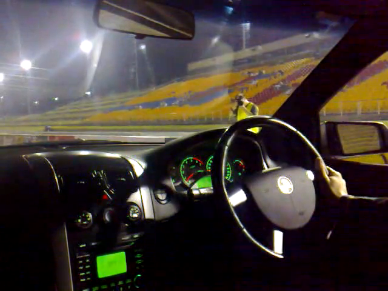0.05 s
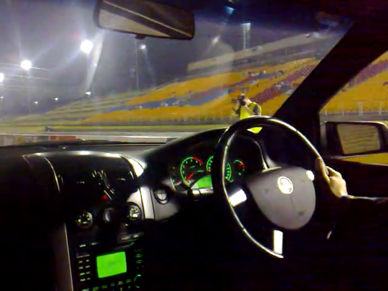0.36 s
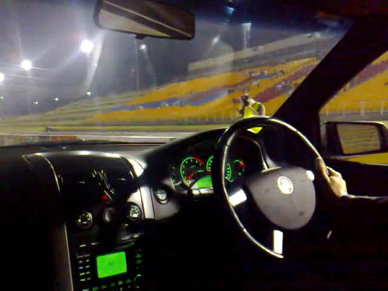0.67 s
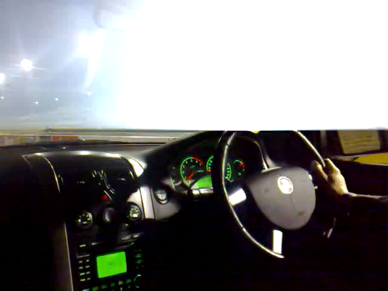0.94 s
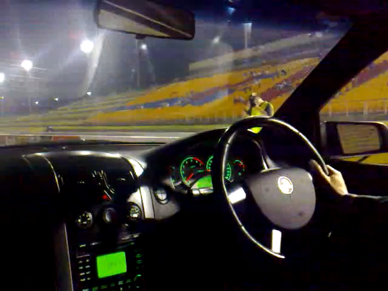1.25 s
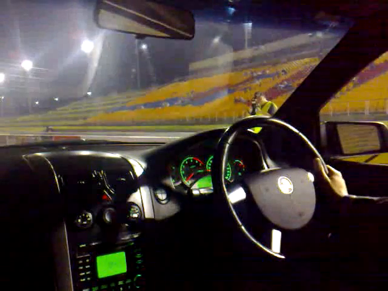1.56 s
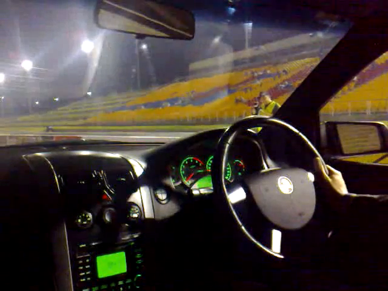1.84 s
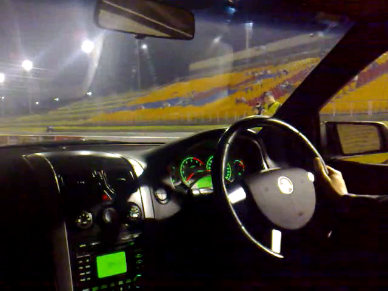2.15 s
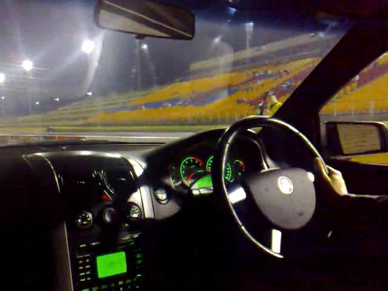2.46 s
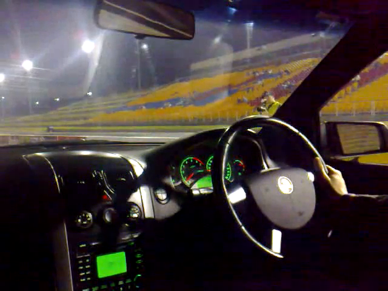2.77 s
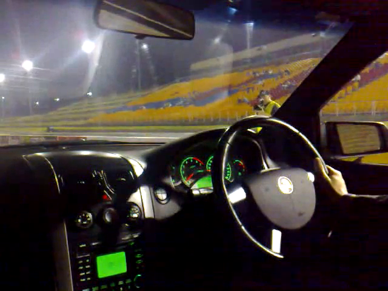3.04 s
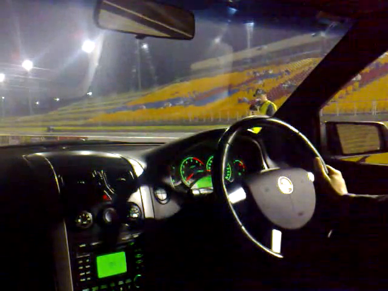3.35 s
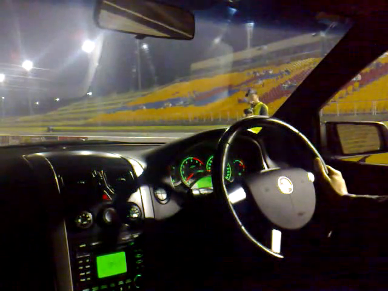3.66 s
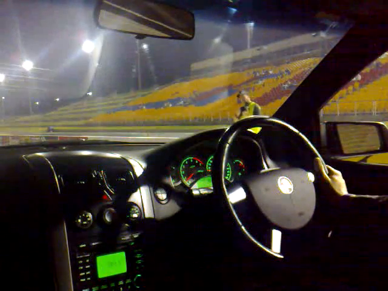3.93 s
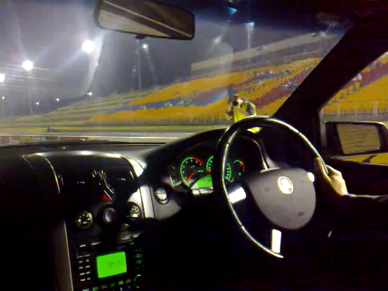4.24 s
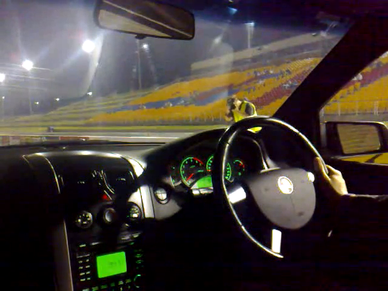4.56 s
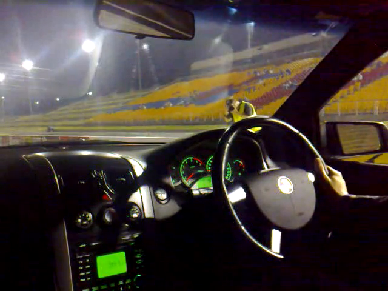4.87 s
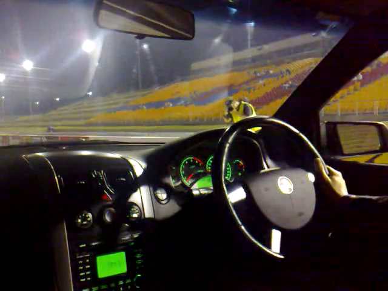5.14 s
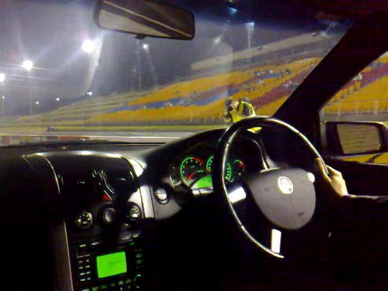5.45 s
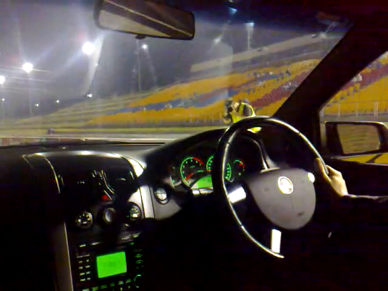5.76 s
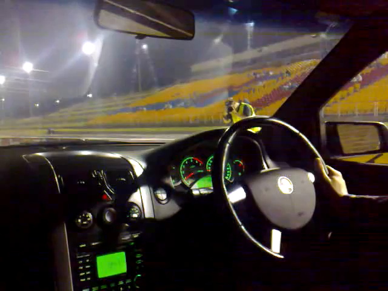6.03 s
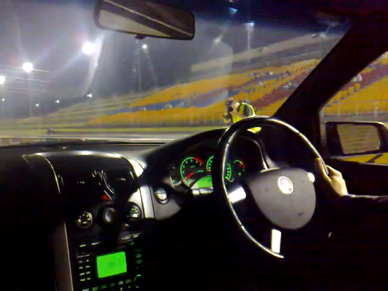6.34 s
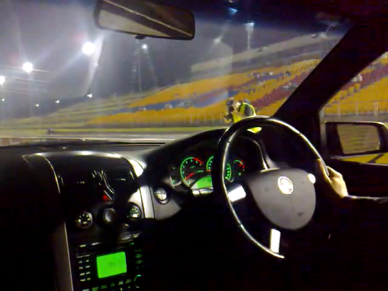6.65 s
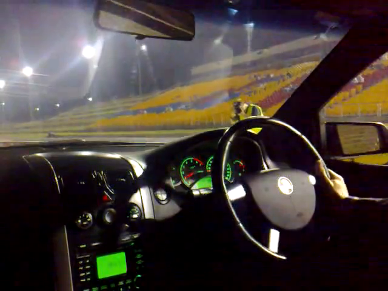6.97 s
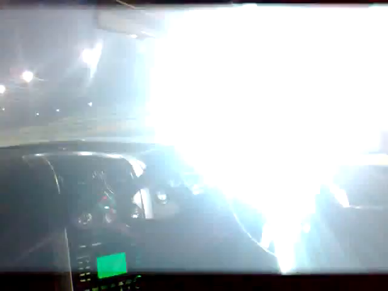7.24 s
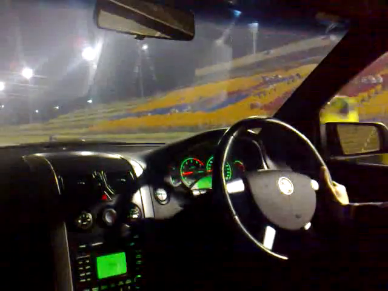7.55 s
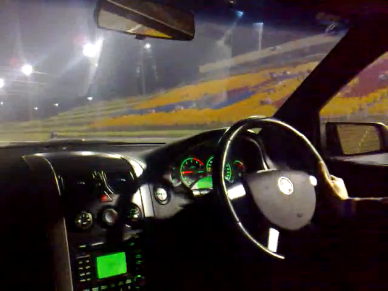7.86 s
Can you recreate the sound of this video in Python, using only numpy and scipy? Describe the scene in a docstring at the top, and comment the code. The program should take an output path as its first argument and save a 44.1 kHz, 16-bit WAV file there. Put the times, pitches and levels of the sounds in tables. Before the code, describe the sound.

A V8 engine idles with a low, uneven lope, heard from between the seats of a car at a drag strip. A few light clicks and trim knocks sound over it. After almost six seconds the revs rise and hold with a boom, sagging a little. Then the car launches at full throttle with a drivetrain clunk, thuds and clattering plastic, the roar climbing fast and starting to ease at the very end.

```python
"""A V8 engine, heard inside the car at a drag strip, lopes at idle, rises against the brake, then launches.
Its firings form a periodic pulse train whose harmonics sweep through the air modes of the cabin, which
boom by resonance. Impacts excite damped vibrations: the drivetrain clunks, loose plastic things clatter
as the car leaps, panels thud and trim knocks. Clothing rustles faintly by friction.
Under full throttle a limiter at the microphone holds down the level and rounds off the peaks."""
import sys
import numpy as np
from scipy import signal
from scipy.fft import rfft, irfft, next_fast_len
from scipy.io import wavfile
from scipy.ndimage import uniform_filter1d, minimum_filter1d, map_coordinates

SR = 44100
rng = np.random.default_rng(int(sys.argv[2]) if len(sys.argv) > 2 else 0)


def persist_wave(psi):
    """Save psi, clipped to +-1, as 16-bit WAV."""
    counts = np.round(np.clip(psi, -1, 1) * 32767).astype(np.int16)
    wavfile.write(sys.argv[1], SR, np.atleast_2d(counts).T)


N = 357210
TIME = np.arange(N) / SR
IDLE_HZ, PULL_HZ = 36.95, 121.4  # firing rates at idle and under full pull

# engine speed: idle, rise against the brake, sag, launch (t/s, firing rate/Hz)
FIRING_RATE = [(5.72, 36.95), (5.84, 40.1), (6.12, 62.3), (6.26, 65.5), (6.7, 58.4), (7.08, 54.5),
               (7.17, 59.5), (7.23, 75), (7.31, 84.5), (7.385, 88.5), (7.43, 97.5), (7.48, 106),
               (7.52, 111), (7.59, 116.2), (7.66, 118.0), (7.94, 121.6), (8.1, 126.2)]
# throttle position (t/s, opening from 0 to 1)
THROTTLE = [(7.012, 0), (7.04, 0.2), (7.15, 0.6), (7.22, 1)]
# exhaust bank of each cylinder, in firing order (0 near, 1 far)
BANKS = [0, 1, 1, 0, 1, 0, 0, 1]
# firing note under throttle, dipping briefly as the revs climb (t/s, level/dB)
NOTE_LOADED = [(7.08, -20), (7.135, -26.5), (7.165, -9.5), (7.195, -13), (7.215, -17), (7.24, -13.5),
               (7.305, -10.5), (7.322, -17), (7.345, -13.5), (7.44, -7), (7.462, -17), (7.485, -9.5),
               (7.525, -8.5), (7.552, -25), (7.59, -7.5), (7.64, -16), (7.75, -15), (8.05, -18)]
# harmonics under load (periods per four-stroke cycle, relative level/dB)
ROAR_ORDERS = [(3, -7), (10, -5), (11, -4), (12, -3), (13, -22.5), (14, -1), (16, -1), (18, -12.5),
               (20, -22), (21, -13), (24, -2.5), (25, -8.5), (26, -9.5), (28, -5.5), (30, -6.5), (32, -2.5)]
# response of the cabin to those harmonics (f/Hz, relative level/dB)
CABIN_RESPONSE = [(40, -13.5), (90, -15), (120, -18), (150, -13), (182, 1), (209, -10.5), (228, -2.5),
                  (248, 3), (275, -19.5), (315, -30.5), (345, -17.5), (375, -9.5), (410, -23.5),
                  (450, -25.5), (800, -39.5), (1400, -80)]
# cabin air modes rung by uneven firing under load (f/Hz, nominal width/Hz, relative level/dB)
ROAR_MODES = [(181.4, 11, 4.5), (221.5, 22, -5), (263.6, 36, -8), (378, 22, -9)]
# the engine lurches on its mounts as the car leaps (t/s, level against the roar/dB)
LURCHES = [(7.011, 11), (7.14, 10.5), (7.222, 9.5)]
# each cylinder's pop at the tailpipe (place/cycles, relative level/dB)
CYLINDER_POPS = [(-.042, 0), (.003, -4), (.2, -10), (.26, -11), (.455, -4), (.51, -4), (.72, -22),
                 (.83, -16)]
# exhaust spectrum under load (f/Hz, relative level/dB)
BARK_SPECTRUM = [(400, -22), (480, -8), (540, 0), (660, 2.5), (740, -3), (840, -3.5), (920, -16),
                 (1100, -32), (2000, -61), (6000, -100)]
# intake and road noise (f/Hz, relative density/dB)
RUSH_SPECTRUM = [(30, 24), (200, 27), (420, 22.5), (650, 8), (1000, 5.5), (1400, -2), (1900, -4),
                 (2500, -12), (3000, -15.5), (3550, -10), (4200, -21.5), (5000, -24.5), (9000, -40)]
# its surges as the tyres bite and the revs shoot up (t/s, rise/s, fall/s, gain/dB)
RUSH_SURGES = [(7.072, 0.14, 0.15, 12.5), (7.52, 0.1, 0.17, 6), (7.6, 0.41, 0.99, 9)]
# exhaust spectrum at idle (f/Hz, relative level/dB)
PIPE_SPECTRUM = [(15, -28), (45, -8.5), (66, 1.5), (82, 0.5), (100, 3), (130, -1), (160, 2), (180, -15),
                 (198, -16), (215, -4.5), (235, -1), (252, -19), (330, -27.5), (420, -30.5), (700, -63)]
# cabin air modes under light load (f/Hz, nominal width/Hz, relative level/dB)
BOOM_MODES = [(216.5, 13, -5), (239.9, 16.8, 0), (272, 15, -19)]
# deep exhaust rumbles where the idle stumbles (t/s, level/dB)
STUMBLES = [(1.41, -20), (1.70, -22), (2.28, -21.5)]
# idle tones (multiple of the firing rate, level/dB)
IDLE_TONES = [(.5, -39), (7.126, -55)]
# engine bay rumble (f/Hz, relative density/dB)
BAY_SPECTRUM = [(60, -23), (200, 2.5), (300, 1), (340, -5.5), (395, .5), (500, -11), (560, -8), (640, -16),
                (780, -15), (900, -21.5), (1020, -21.5), (1140, -21), (1260, -26.5), (1800, -36),
                (4000, -49.5)]
# resonances of pumps and belt (f/Hz, nominal width/Hz, relative level/dB)
PUMP_MODES = [(1050, 35, -2), (1145, 59, 2.5), (2193, 38, -6.5)]
# valve gear whirr (f/Hz, relative density/dB)
VALVE_SPECTRUM = [(700, -29), (1500, -2), (2000, -5.5), (2250, 2.5), (2600, -1), (3050, 0), (3400, -5.5),
                  (4200, -8), (5500, -14.5), (8000, -21.5), (15000, -38)]
# air hissing past the throttle (f/Hz, relative density/dB)
BLEED_SPECTRUM = [(4000, -3.5), (8000, -3.5), (12000, -2.5), (15500, 2)]
# drivetrain modes (f/Hz, relative level/dB, t60/s)
CLUNK_MODES = [(582, 8, 0.015), (724, -6, 0.026), (846, -12, 0.027), (1120, -22, .03), (397, -5, 0.06)]
# loose things hitting the dash (t/s, relative level/dB, snap offset/dB, ring offset/dB, snap t60/s)
PLASTIC_HITS = [(1.138, -23, -23.5, -20, 0.043), (1.143, -30, -28, -10, 0.056), (1.152, -45, -18, -12, .12),
                (1.346, -50, -8, -15, .08), (1.412, -34, -37, -14, 0.083), (3.582, -36.5, -36, -18, 0.081),
                (3.621, -39, -29, -10, .06), (7.0182, -28.5, -26, -11, 0.055), (7.031, -30, -38, -15, 0.1),
                (7.0756, -27.5, -35.5, -8.5, 0.13), (7.106, -42, -28, -9.5, .07),
                (7.163, -36, -17, -12, 0.07), (7.2535, -32.5, -32.5, -16, 0.069),
                (7.315, -34.5, -28.5, -8, 0.13), (7.396, -16, -30, -24, 0.058),
                (7.405, -30, -20, -14, 0.051), (7.425, -22, -28, -1, 0.083), (7.465, -39, -14, -8, 0.11),
                (7.4935, -12, -8, -4, 0.035), (7.505, -26, -14, -7, 0.062), (7.526, -27, -18, -2, 0.1),
                (7.5364, -19, -7.5, 6.5, 0.058), (7.5472, -24.5, -8.5, 1, 0.069),
                (7.555, -31, -17, 5, 0.071), (7.5824, -32, -17, -8, 0.078)]
# their dull rattle (f/Hz, relative density/dB)
RATTLE_SPECTRUM = [(400, -9.5), (900, 1.5), (1250, -1), (1550, -4.5), (1850, -2.5), (2300, 0), (2800, -6),
                   (3800, -8.5), (4600, -14), (7000, -26.5), (15000, -37.5)]
# their bright snap (f/Hz, relative density/dB)
SNAP_SPECTRUM = [(2000, -32), (3500, 1), (4200, -1), (4700, 2), (5700, 1.5), (6300, -1.5), (6900, 0.5),
                 (7700, -3), (8300, -8), (12000, -10.5), (15500, -13)]
# their hollow ring (f/Hz, relative level/dB, t60/s)
HOLLOW_MODES = [(1420, -1, .075), (1505, -0.5, .08), (1628, -0.5, 0.077), (1660, -7.5, .06),
                (1817, -9, .06), (3606, -5, .055), (3800, -7, 0.059)]
# panel thuds (t/s, level/dB, f/Hz, t60/s)
THUDS = [(1.143, -41, 587, 0.052), (5.04, -43, 640, 0.041), (5.262, -39, 542, 0.2),
         (5.311, -32.5, 735, 0.057), (7.019, -20.5, 293, 0.09), (7.106, -15.5, 370, .07),
         (7.397, -21, 560, 0.058), (7.495, -15, 464, 0.087)]
# knocks of trim and pedals (t/s, level/dB, centre f/Hz, t60/s)
KNOCKS = [(2.088, -45.5, 1200, .08), (3.109, -39.5, 1300, .09), (3.386, -44, 1100, .09),
          (3.474, -39, 1050, .11), (3.694, -40, 750, .07), (4.134, -40, 1150, .08), (4.664, -45, 1400, .06),
          (4.722, -37, 1300, .07), (5.038, -31, 1300, .055), (5.31, -28, 700, .06)]
# resonances of the trim (f/Hz, relative level/dB)
TRIM_SPECTRUM = [(300, -10), (520, -3), (610, -6), (740, 3), (910, -10), (1110, 1), (1250, -5), (1400, -1),
                 (1600, -11), (1820, -4), (2050, -13), (2250, -10), (2550, -19), (2900, -11), (3400, -22),
                 (9000, -40)]
# small clicks (t/s, level/dB)
CLICKS = [(1.14, -31.5), (1.416, -47)]
# their modes (f/Hz, relative level/dB, t60/s)
CLICK_MODES = [(930, -1, 0.034), (1350, -1, 0.043), (1960, -2, 0.036), (2210, 4, 0.048), (2340, -16, 0.037)]
# clothing shifting on the seats (t/s, half-width/s, level/dB)
RUSTLES = [(0.34, 0.087, -59.5), (0.57, 0.057, -58.5), (.75, 0.056, -58), (1.337, 0.21, -58.5),
           (2.272, 0.067, -60.5), (5.202, .05, -70), (5.416, 0.082, -58)]
# rubbing cloth (f/Hz, relative density/dB)
FABRIC_SPECTRUM = [(900, -3), (2500, 3), (5000, -10), (9000, -25), (15000, -16)]


def engine(hunt=.005):
    """Periodic combustion: one firing phase drives all orders; the throttle trades idle for roar."""
    throttle = curve(THROTTLE)
    steady = curve(FIRING_RATE)
    rate = steady * (1 + hunt * (1 - throttle) * wobble(3))  # the idle hunts a little
    firings = np.cumsum(rate) / SR
    climb = uniform_filter1d(np.gradient(steady) * SR, size=SR // 6)  # Hz/s
    return (firing_note(rate, firings, throttle, climb)
            + np.sqrt(1 - throttle ** 2) * idle(rate, firings)
            + np.sqrt(throttle) * roar(rate, firings))


def firing_note(rate, firings, throttle, climb):
    """The fundamental of the pulse train grows with load; uneven firing modulates its level and phase."""
    light = (1 - throttle) * amp(-25.5 + .0839 * np.minimum(climb, 90))
    loaded = throttle * amp(curve(NOTE_LOADED))
    uneven = np.interp(rate, [40, 60, 95, 118], [.03, .16, .09, .06])
    strength = (light + loaded) * (1 + uneven * wobble(28))
    fundamental = strength * np.sin(2 * np.pi * firings + uneven * wobble(28))
    second_gain = light * amp(-8 + 2.5 * octaves(rate) + 3.2 * wobble(8))
    second = second_gain * np.sin(4 * np.pi * firings + uneven * wobble(29))
    return np.sqrt(2) * (fundamental + second)


def roar(rate, firings, beat_s=7.747):
    """Forced response of the cabin at full throttle, amplitude-modulated once per crank turn."""
    cycles = (firings - np.interp(beat_s, TIME, firings)) / len(BANKS)
    turn = np.cos(4 * np.pi * cycles)
    # combustion is ragged while the revs shoot up, and cleans up once the car is pulling
    ragged = np.interp(rate, [70, 105, 117], [.18, .05, .01])
    tone = engine_orders(rate, cycles)
    air = resonant_noise(ROAR_MODES)
    body = (np.sqrt(1 - ragged) * tone + np.sqrt(ragged) * air) * (1 + .2 * turn)
    low_noise = noise([(25, -4.5), (45, 12.5), (110, 6), (170, 8), (300, -48), (2000, -110)])
    shudder = amp(-19) * np.sqrt(ragged + .21) * low_noise
    return roar_gain(rate) * body + shudder + rush(turn) + bark(rate, cycles)


def engine_orders(rate, cycles, rough=.06, lag_cycles=.1996):
    """Fourier series of the four-stroke cycle, weighted by the cabin response at constant power."""
    tone, power = np.zeros(N), np.zeros(N)
    for order, db in ROAR_ORDERS:
        strength = amp(db) * gain_at(CABIN_RESPONSE, order * rate / len(BANKS))
        late = lag_cycles * (order > 22)  # the upper cabin mode answers late
        phase = 2 * np.pi * (order * (cycles - late) + .077 * rng.standard_normal()) + rough * wobble(30)
        tone += strength * (1 + rough * wobble(40)) * np.sin(phase)
        power += strength ** 2 / 2
    return tone / np.sqrt(power)


def roar_gain(rate, db_per_octave=16.5, lift_s=7.887):
    """A power law of engine speed, with transient lurches and exponential decay as the driver lifts."""
    lurch = 1 + sum(amp(db) * burst(s, t60=.11, rise=.0027) for s, db in LURCHES)
    fade_db = 36.5 * np.maximum(TIME - lift_s, 0)
    return lurch * amp(-3.5 + db_per_octave * np.log2(rate / PULL_HZ) - fade_db)


def bark(rate, cycles, lead_cycles=.025, ease_s=7.825):
    """Source and filter: unequal cylinder pops and their turbulence excite the exhaust's resonances."""
    pops = np.zeros(N)
    for place, db in CYLINDER_POPS:
        fired = np.floor(cycles + lead_cycles - place)
        pops += amp(db + wobble(30)) * np.diff(fired, prepend=fired[0])
    turbulence = lowpass(pops, 90, order=2) * rng.standard_normal(N) * np.sqrt(SR / 180)
    pipe = colour(pops + amp(-13) * turbulence, BARK_SPECTRUM)
    pulling = np.interp(rate, [116, 116.6], [0, 1])
    pipe /= np.sqrt(np.average(pipe ** 2, weights=pulling))
    climbing = amp(-19) * (1 - pulling) * (rate / PULL_HZ) ** 2
    ease_db = 54.5 * np.maximum(TIME - ease_s, 0)  # the driver lifts
    return amp(-24.5 - ease_db) * (pulling + climbing) * pipe


def rush(turn):
    """Broadband intake and road noise; transmission loss in firewall and door seals removes its treble."""
    level_db = -30.5 + sum(swell(*surge) for surge in RUSH_SURGES)
    return amp(level_db) * lowpass(noise(RUSH_SPECTRUM, gate=1 + .2 * turn), 5000, order=4)


def idle(rate, firings):
    """Superposition of the lightly loaded engine's sources; lope, boom and valves vary with speed."""
    settle_db = swell(5.5, rise=.7, fall=.2, db=-2)
    brake_db = swell(6.25, rise=.3, fall=.62, db=5.2)  # brought up against the brake
    lope_db = -25.5 - 5 * octaves(rate) + settle_db + .47 * wobble(10)
    boom_db = -31.5 + 6 * octaves(rate) + brake_db + wobble(8)
    valve_db = -59 - 1.5 * octaves(rate) + 1.1 * wobble(3.7)
    return (amp(lope_db) * lope(firings) + amp(boom_db) * boom(rate, firings)
            + idle_tones(firings) + engine_bay(rate, firings) + amp(valve_db) * valve_gear()
            + stumbles(firings) + throttle_bleed(rate))


def lope(firings, bank_lag_s=.0042, jitter_s=.0016, far_bank_db=-6):
    """Path difference: the two banks' pipes differ in length, so the train of exhaust puffs limps."""
    fired = np.flatnonzero(np.diff(np.floor(firings)))
    bank = np.take(BANKS, np.arange(len(fired)) % len(BANKS))
    timing, size = rng.standard_normal((len(fired), 2)).T
    arrival = np.clip(fired + SR * (bank_lag_s * bank + jitter_s * timing), 0, N - 1).astype(int)
    puffs = np.bincount(arrival, amp(far_bank_db * bank) * (1 + .28 * size), N)
    turbulence = amp(-6) * noise(PIPE_SPECTRUM)
    return unit(lowpass(unit(colour(puffs, PIPE_SPECTRUM)) + turbulence, 318, order=4))


def boom(rate, firings, mode_hz=227, width_hz=20):
    """Resonance: a harmonic meets a cabin mode at idle; off idle, uneven firing rings the air modes."""
    harmonic = np.arange(2, 8)[:, None]
    weight = 1 / (1 + (2 * (harmonic * rate - mode_hz) / width_hz) ** 2)
    tone = np.sum(weight * np.sin(2 * np.pi * harmonic * firings + .14 * wobble(33)), 0)
    throb = 1 + .11 * np.sin(2 * np.pi * firings / len(BANKS)) + .069 * wobble(30)
    air_share = np.interp(rate, [38, 46], [.02, .7])
    air = resonant_noise(BOOM_MODES)
    air /= np.sqrt(np.abs(uniform_filter1d(air ** 2, size=SR // 8)) + 1e-6)  # rough, but evenly driven
    return np.sqrt(1 - air_share) * unit(tone * throb) + np.sqrt(air_share) * air


def stumbles(firings):
    """The lowest components of the exhaust pulse train swell where the idle stumbles."""
    envelope = sum(amp(db) * hump(s, half_width=.14) for s, db in STUMBLES)
    return envelope * unit(lowpass(lope(firings), 106, order=6))


def idle_tones(firings):
    """Pure tones in fixed ratio to the firing rate, slowly wavering in level."""
    return sum(amp(db + 1.1 * wobble(3.3)) * np.sqrt(2) * np.sin(2 * np.pi * multiple * firings)
               for multiple, db in IDLE_TONES)


def engine_bay(rate, firings):
    """Rotating machinery: a belt-driven accessory's tone, narrow-band pump hum and a broad rumble."""
    whine_db = -53.5 + swell(4.44, rise=.28, fall=.54, db=15.7) + 1.5 * wobble(3)
    whine = amp(whine_db) * np.sin(2 * np.pi * 10 * firings) / (1 + (rate / 48) ** 8)  # fades off idle
    pumps = amp(-65 + 1.5 * wobble(4.5)) * resonant_noise(PUMP_MODES)
    rumble = amp(-42 + 1.5 * wobble(5.49)) * noise(BAY_SPECTRUM)
    return whine + pumps + rumble


def valve_gear():
    """The whirr of valve gear behind the firewall, diffused by reflection."""
    return reflected(noise(VALVE_SPECTRUM), t60=.12, wet=.6) * amp(.69 * wobble(16))


def throttle_bleed(rate):
    """Flow noise at the nearly shut throttle, dying away as the revs rise."""
    return amp(-68 - 9 * octaves(rate) + .6 * wobble(1.8)) * noise(BLEED_SPECTRUM)


def clunk():
    """Impulse response of the drivetrain as it takes up its slack."""
    return ring(s=7.078, db=-7.5, modes=CLUNK_MODES)


def clatter():
    """Impact noise: each loose plastic thing gives a dull rattle, a hollow ring and a shorter snap."""
    rattle, hollow, snap = np.zeros((3, N))
    for s, db, snap_db, ring_db, t60 in PLASTIC_HITS:
        rattle += amp(db - 9) * burst(s, 1.19 * t60, rise=.0019)
        hollow += hollow_ring(s, db + ring_db - 9.5)
        snap += amp(db + snap_db + 1.5) * burst(s, t60, rise=.00098)
    grit = amp(4.5 * wobble(1100))
    rattle *= reflected(noise(RATTLE_SPECTRUM), t60=.049, wet=.36)
    snap *= reflected(noise(SNAP_SPECTRUM, grit), t60=.04, wet=.25)
    return rattle + hollow + snap


def hollow_ring(s, db, rise_s=.0007):
    """Normal modes of a hollow plastic thing; their levels and phases vary from strike to strike."""
    t, out = np.arange(SR // 6) / SR, np.zeros(N + SR)
    chance = rng.standard_normal((len(HOLLOW_MODES), 2))
    modes = sum(amp(level + 2 * scatter - 60 * t / t60) * np.sin(2 * np.pi * (hz * t + phase))
                for (hz, level, t60), (scatter, phase) in zip(HOLLOW_MODES, chance))
    out[round(s * SR):][:len(t)] = amp(db) * (1 - np.exp(-t / rise_s)) * modes
    return out[:N]


def thuds():
    """Each bumped panel is a damped oscillator with one low note."""
    return sum(ring(s, db, [(hz, 0, t60)]) for s, db, hz, t60 in THUDS)


def knocks(octave_drop_db=3.5, rise_s=.0043):
    """Heavily damped impacts: each favours the trim's resonances near its own centre frequency."""
    t, out = np.arange(SR // 4) / SR, np.zeros(N + SR)
    for s, db, hz, t60 in KNOCKS:
        spectrum = [(f, level - octave_drop_db * np.log2(f / hz) ** 2) for f, level in TRIM_SPECTRUM]
        envelope = (1 - np.exp(-t / rise_s)) * amp(db - 60 * t / t60)
        out[round(s * SR):][:len(t)] += envelope * unit(colour(rng.standard_normal(len(t)), spectrum))
    return out[:N]


def clicks():
    """Brief free vibration of a few high modes, heard as clicks."""
    return sum(ring(s, db, CLICK_MODES) for s, db in CLICKS)


def rustles():
    """Friction noise of clothing shifting against the seats."""
    envelope = sum(amp(db) * hump(s, half_width) for s, half_width, db in RUSTLES)
    return envelope * noise(FABRIC_SPECTRUM, gate=amp(2 * wobble(120)))


def ring(s, db, modes):
    """Free vibration: a sum of damped sinusoids struck at time s."""
    return sum(amp(db + level) * burst(s, t60, rise=.00089) * np.sin(2 * np.pi * hz * (TIME - s))
               for hz, level, t60 in modes)


def resonant_noise(modes):
    """Random excitation of resonators, each response squared for steep skirts; rms 1."""
    size = next_fast_len(N + SR // 2)
    f = np.fft.rfftfreq(size, 1 / SR)
    response = sum(amp(db) * (1j * f * width / (hz * hz - f * f + 1j * f * 1.02 * width)) ** 2
                   for hz, width, db in modes)
    return unit(irfft(rfft(rng.standard_normal(N), size) * response, size)[:N])


def reflected(x, t60, wet):
    """Interference with dense reflections off glass and trim combs the spectrum; rms 1."""
    t = np.arange(SR // 8) / SR
    tail = rng.standard_normal(len(t)) * amp(-60 * t / t60)
    return unit(x + wet * signal.fftconvolve(x, tail / np.linalg.norm(tail))[:N])


def noise(spectrum, gate=1):
    """White noise, modulated and then filtered; rms 1."""
    return unit(colour(gate * rng.standard_normal(N), spectrum))


def colour(x, spectrum):
    """Minimum-phase filter of unit energy, built by folding the cepstrum."""
    size = 2 * next_fast_len(len(x) // 2 + 8192)
    gain = unit(gain_at(spectrum, np.fft.rfftfreq(size, 1 / SR)))
    cepstrum = irfft(np.log(np.maximum(gain, 1e-6)))
    cepstrum[1:size // 2] *= 2
    cepstrum[size // 2 + 1:] = 0
    return irfft(rfft(x, size) * np.exp(rfft(cepstrum)), size)[:len(x)]


def gain_at(spectrum, hz):
    """Magnitude response interpolated in log frequency, falling 12 dB/octave below the first point."""
    f, db = np.transpose(spectrum)
    return amp(np.interp(np.log(hz + 1), np.log(f + 1), db)) * np.minimum(hz / f[0], 1) ** 2


def lowpass(x, hz, order):
    """Maximally flat low-pass filter."""
    return signal.sosfilt(signal.butter(order, hz, fs=SR, output="sos"), x)


def burst(s, t60, rise):
    """Exponential attack and decay from time s."""
    t = np.maximum(TIME - s, 0)
    return (1 - np.exp(-t / rise)) * amp(-60 * np.minimum(t / t60, 4))


def swell(s, rise, fall, db):
    """Triangular excursion of level, reaching db at time s."""
    return np.interp(TIME, [s - rise, s, s + fall], [0, db, 0])


def hump(s, half_width):
    """Bell-shaped envelope, down to 1/e at half_width either side of time s."""
    return np.exp(-((TIME - s) / half_width) ** 2)


def wobble(knots_per_s):
    """Smooth random modulation: a spline through random knots."""
    knots = rng.standard_normal(int(N * knots_per_s / SR) + 4)
    return map_coordinates(knots, [TIME * knots_per_s])


def curve(rows):
    """Linear interpolation of (t/s, value) rows."""
    return np.interp(TIME, *np.transpose(rows))


def octaves(rate):
    """Interval of the firing rate above idle."""
    return np.log2(rate / IDLE_HZ)


def amp(db):
    """Amplitude ratio of a level in dB."""
    return 10 ** (np.asarray(db) / 20)


def unit(x):
    """Normalisation to rms 1."""
    return x / np.sqrt(np.mean(x ** 2) + 1e-20)


def scene():
    """Superposition of all sources at one point between the seats."""
    return (engine() + rustles() + knocks() + thuds() + clatter() + clicks() + clunk())[None]


def record(dry, limit=1.1, hold_s=.0028, ceiling=1.2, hardness=5, hiss_db=-71, top_hz=15730):
    """Fast limiting and soft saturation round off the peaks; hiss and a band limit follow."""
    driven = amp(.5) * dry
    needed = np.minimum(1, limit / (np.abs(driven) + 1e-9))
    hold = int(hold_s * SR)
    gain = minimum_filter1d(needed, 2 * hold)
    held = driven * uniform_filter1d(uniform_filter1d(gain, hold), hold)
    rounded = held / (1 + np.abs(held / ceiling) ** hardness) ** (1 / hardness)
    heard = rounded + amp(hiss_db) * rng.standard_normal(dry.shape)
    band = np.clip((top_hz - np.fft.rfftfreq(2 * N, 1 / SR)) / 200 + .5, 0, 1)
    mirrored = np.hstack([heard, heard[:, ::-1]])  # keeps the ends free of clicks
    return irfft(rfft(mirrored) * band)[:, :N]


dry = scene()
out = record(dry)
persist_wave(out)
```